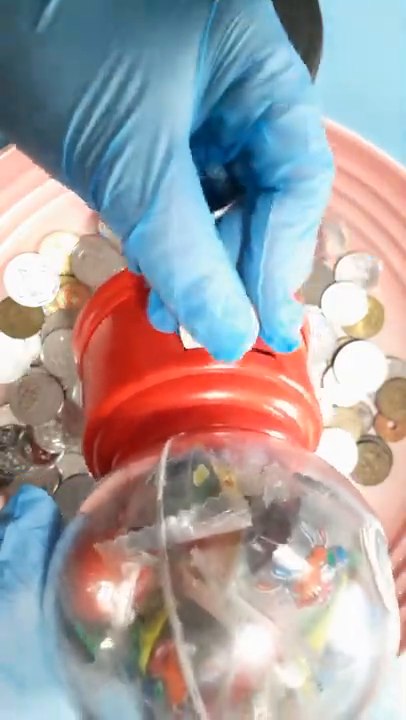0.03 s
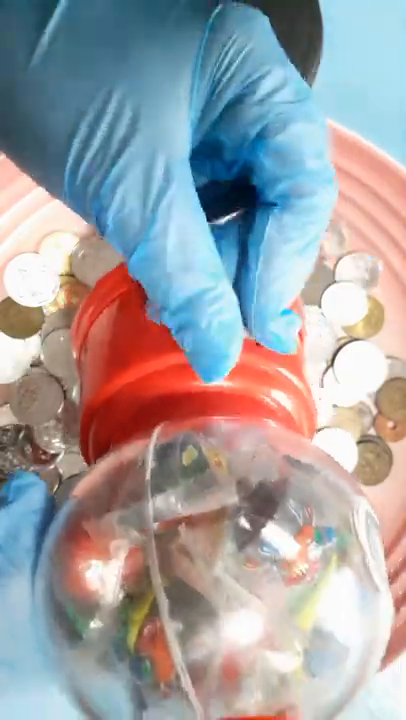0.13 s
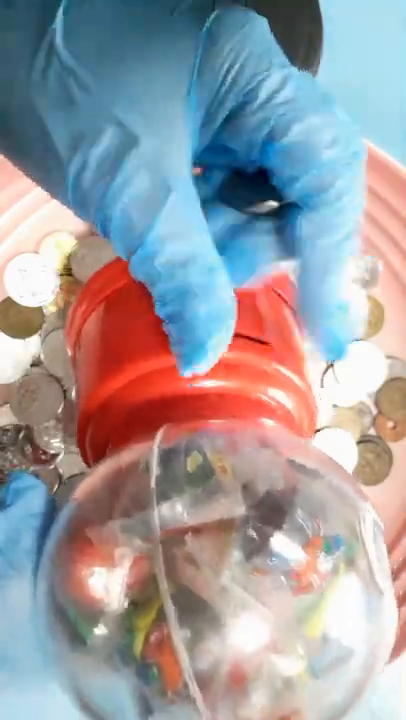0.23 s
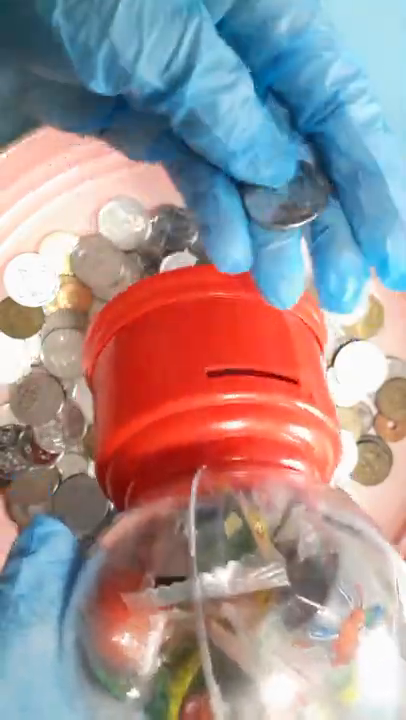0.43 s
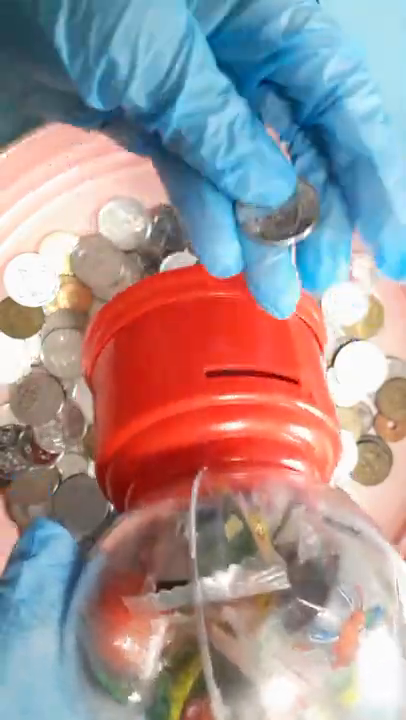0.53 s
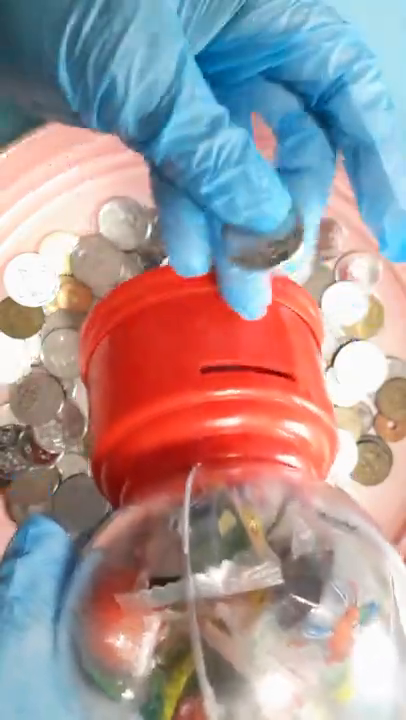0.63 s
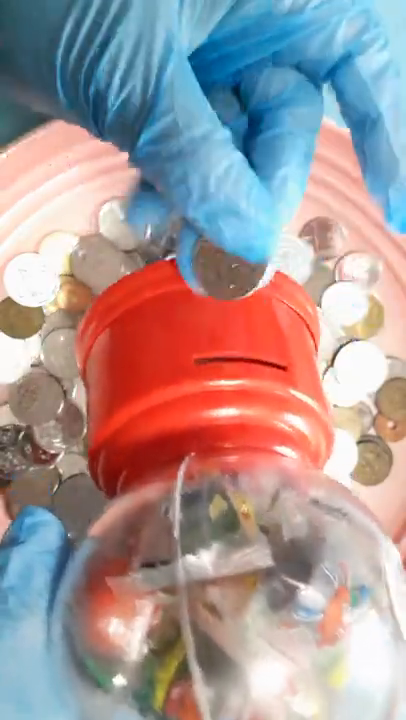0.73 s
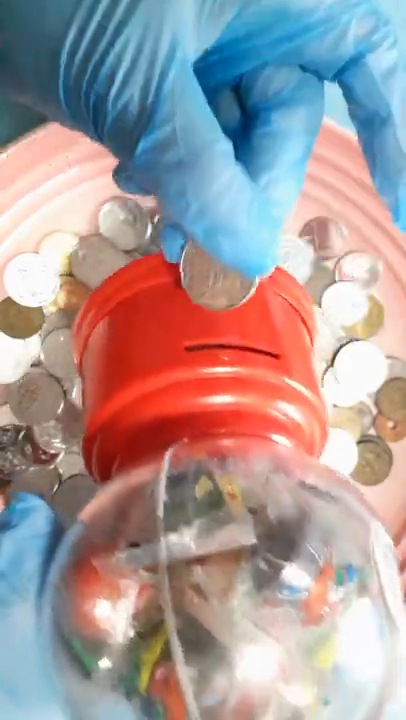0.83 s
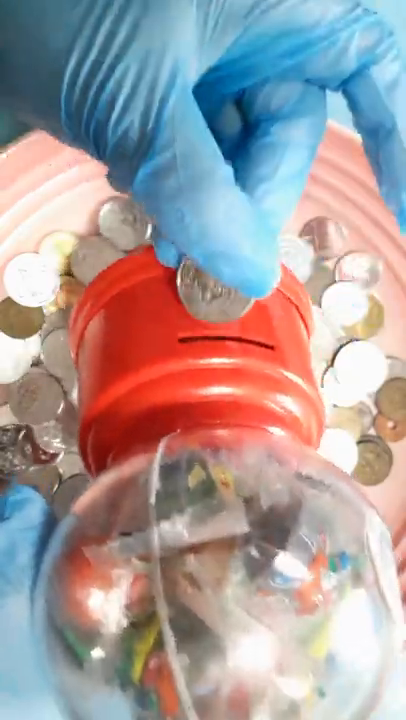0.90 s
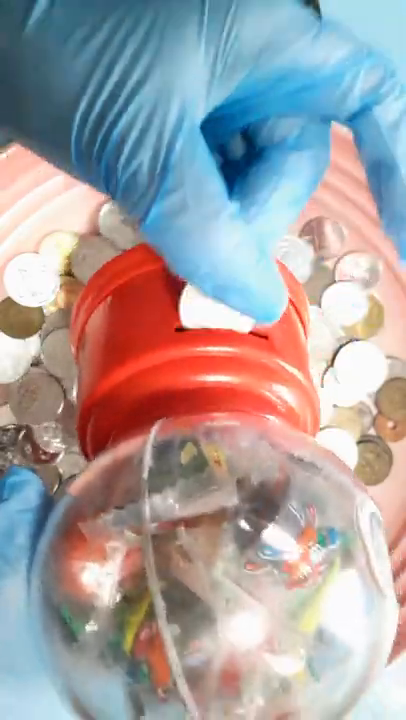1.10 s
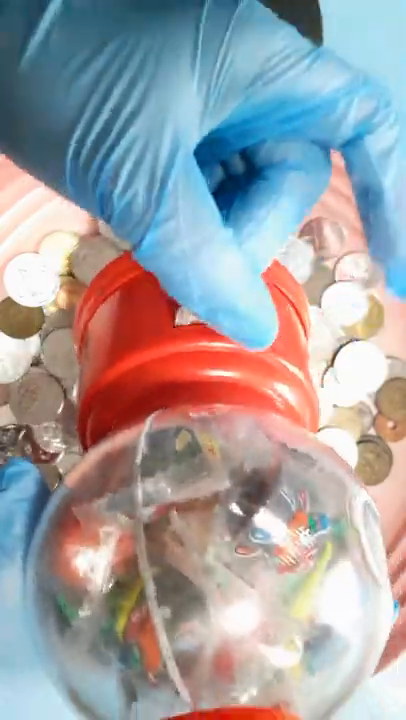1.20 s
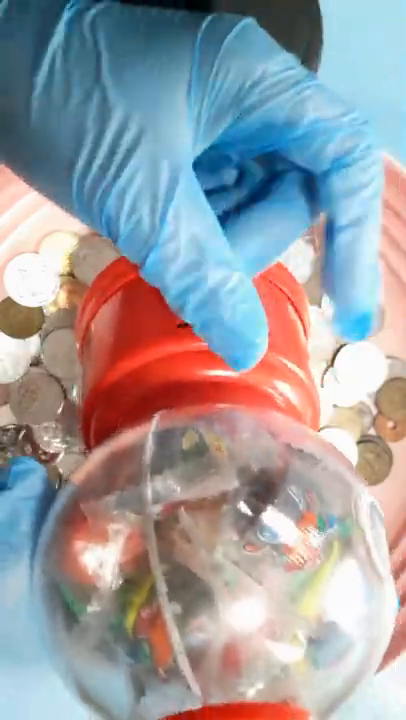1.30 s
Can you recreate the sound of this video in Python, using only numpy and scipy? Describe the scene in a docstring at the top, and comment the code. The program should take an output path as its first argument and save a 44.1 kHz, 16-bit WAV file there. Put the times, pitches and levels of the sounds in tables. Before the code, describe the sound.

Coin falling inside a thin plastic bank: brief sliding, a quick burst of bright knocks and clinks dying away, a quieter gap with faint rustling, then light taps and a short squeaky scrape. Close up indoors, faint fan air.

```python
"""A coin bounces down inside a small plastic gumball bank onto other coins, after a gloved hand pushes it in.
A second coin taps the lid, scrapes along it and catches in the slot; the glove rustles in between.
Contacts are shaped noise cracks with ringing modes, sliding is dense random slips, chatter is sparse clicks.
Close stereo microphone in a small room with a short diffuse tail; fan-like air noise and a low hum behind."""
import sys
import numpy as np
from scipy import signal
from scipy.fft import rfft, irfft, next_fast_len
from scipy.io import wavfile

SR = 44100
rng = np.random.default_rng(int(sys.argv[2]) if len(sys.argv) > 2 else 0)


def unload_audio(sound):
    """Save the sound as a 16-bit wav file, at the path given as the first command line argument."""
    columns = np.transpose(np.atleast_2d(sound))
    # keep every value between -1 and 1, then stretch to whole-number steps
    steps = np.round(np.clip(columns, -1, 1) * 32767)
    wavfile.write(sys.argv[1], SR, steps.astype(np.int16))


N = 59535
T = np.arange(N) / SR
SIZE = 2 * next_fast_len(N)  # padded transform length
FREQS = np.maximum(np.arange(SIZE // 2 + 1) * SR / SIZE, 1)

ATTACK_S = 0.00024  # rise time constant of every contact
RESONANCE_OCT, TREBLE_HZ = 0.2, 5460

# Colour of a coin sliding on plastic. Each row: frequency in Hz, relative noise density in dB per Hz.
SLIDE_COLOUR = [(100, -3), (500, -0.5), (1000, 1.5), (1900, 2.5), (3000, -3), (5000, -9.5), (8000, -7.5),
                (10000, -25.5), (16000, -18.5)]


def undb(db):
    """Decibels to an amplitude factor."""
    return 10 ** (np.asarray(db) / 20)


def unit(x):
    """Scale to rms 1."""
    return x / np.sqrt(np.mean(x ** 2))


def fade(t60):
    """Exponential decay that falls 60 dB in t60 seconds."""
    return np.exp(-np.log(1000) * T / max(t60, 1e-3))


def curve(points):
    """(Hz, dB) points joined on a log-frequency axis."""
    hz, db = np.array(points).T
    return np.interp(np.log(FREQS), np.log(hz), db)


def bump(hz, octaves):
    """Bell-shaped resonance of height 1."""
    return np.exp(-.5 * (np.log2(FREQS / hz) / octaves) ** 2)


def tint(x, db):
    """Causal (minimum-phase) filter with the given gain curve, by folding its cepstrum."""
    cepstrum = irfft(np.log(undb(db)))
    cepstrum[1:SIZE // 2] *= 2
    cepstrum[SIZE // 2 + 1:] = 0
    response = np.exp(rfft(cepstrum))
    return irfft(rfft(x, SIZE) * response)[..., :N]


def pan(db):
    """Left and right gains for a level difference; positive is louder on the left."""
    return undb(np.array([[1], [-1]]) * db / 2)


def place(x, at):
    """Delay a sound to its starting time."""
    start = int(np.clip(at * SR, 0, N - 1))
    return np.pad(x, ((0, 0), (start, 0)))[:, :N]


def spread(x, alike_hz, balance):
    """Two unrelated signals become left and right, alike in the bass, where the right arrives a little late."""
    lag_s = 0.00024  # full lag in the deep bass, shrinking as the sides grow unlike
    mid, side = rfft(x, SIZE)
    alike = 1 / (1 + (FREQS / alike_hz) ** 2)
    shared = mid * np.sqrt((1 + alike) / 2)
    opposed = np.array([[1], [-1]]) * side * np.sqrt((1 - alike) / 2)
    late = np.exp(-2j * np.pi * FREQS * alike * lag_s * np.array([[0], [1]]))
    return irfft((shared + opposed) * late * pan(curve(balance)))[:, :N]


def fan():
    """Steady air noise with a low resonance and thin noise-band whistles, plus a sine hum stronger on the right."""
    # Air noise. Each row: frequency in Hz, relative noise density in dB per Hz.
    air_colour = [(20, -37), (50, -34), (100, -14), (200, -12.5), (320, 4), (480, -18.5), (1000, -18.5),
                  (1900, -27), (3200, -31), (5000, -29.5), (8000, -34.5), (9800, -41.5), (15500, -38)]
    # Thin whistles. Each row: frequency in Hz, width in octaves, height in dB.
    whistles = [(2436, .06, 18.9), (4040, 0.056, 15.1), (5270, 0.083, 14)]
    # Lean of the air noise. Each row: frequency in Hz, left against right in dB.
    air_balance = [(100, -7.5), (300, -3.5), (1500, -12), (3000, -0.5), (8000, -10), (10500, 13),
                   (16000, 2.5)]
    air_db, alike_hz, hum_hz, hum_db = -56, 2490, 121.5, -71.5
    colour = curve(air_colour) + sum(db * bump(hz, width) for hz, width, db in whistles)
    noise = tint(rng.standard_normal((2, N)), colour)
    air = unit(spread(noise, alike_hz, air_balance))
    hum = pan(db=-9.0) * unit(np.sin(2 * np.pi * hum_hz * T))
    return undb(air_db) * air + undb(hum_db) * hum


def room(x):
    """A short diffuse tail from the walls: the close sound convolved with fading noise."""
    # Colour of the tail. Each row: frequency in Hz, gain in dB.
    wall_colour = [(100, 6.5), (400, 6), (1500, 3.5), (4000, 3), (8000, 0), (11000, -1), (16000, -1)]
    level_db, t60_s, build_s = -14, 0.23, 0.0049
    build = 1 - np.exp(-(T / build_s) ** 2)
    tail = rng.standard_normal((2, N)) * fade(t60_s) * build
    tail = tint(unit(tail) / np.sqrt(N), curve(wall_colour))
    return undb(level_db) * pan(db=-2.0) * signal.fftconvolve(x, tail, axes=1)[:, :N]


def friction(colour, at, rise, fall):
    """Dense tiny slips at random instants that swell and die away."""
    slips_per_s = 3500  # on average
    slips = (rng.random(N) < slips_per_s / SR) * rng.standard_normal((2, N))
    swell = np.exp(-.5 * ((T - at) / np.where(T < at, rise, fall)) ** 2)
    return unit(tint(slips, colour)) * swell


def rustles():
    """The glove rustles as the hand lets go: soft swells of friction."""
    # Each row: peak time in seconds, rise in seconds, fall in seconds, level in dB.
    moves = [(0.521, 0.091, 0.062, -68), (0.639, .03, 0.018, -65.5), (.75, 0.053, 0.052, -62.5)]
    # Colour of the glove. Each row: frequency in Hz, relative noise density in dB per Hz.
    glove_colour = [(200, -2), (1500, -3), (4000, -1), (8000, 0.5), (10500, -8), (14000, -3), (16000, -20)]
    return sum(undb(db) * friction(curve(glove_colour), at, rise, fall) for at, rise, fall, db in moves)


def scrapes():
    """The coin slides over the lid: friction with one resonance for each stroke."""
    # Each row: peak time in seconds, rise in seconds, fall in seconds, level in dB, resonance in Hz.
    strokes = [(0.028, 0.14, 0.036, -53, 1700), (0.144, 0.066, 0.074, -55, 966),
               (1.188, 0.068, 0.012, -53, 1660)]
    peak_db, width_oct = 4.5, 0.14
    sound = 0
    for at, rise, fall, db, hz in strokes:
        colour = curve(SLIDE_COLOUR) + peak_db * bump(hz, width_oct)
        sound = sound + undb(db) * friction(colour, at, rise, fall)
    return sound


def squeak():
    """The coin's edge sticks and slips on the lid: a brief rough note with its octave."""
    at_s, width_s, level_db = 1.192, .008, -45.5
    note_hz, note_oct, octave_db = 965, .08, -6
    gain = bump(note_hz, note_oct) + undb(octave_db) * bump(2 * note_hz, note_oct)
    colour = 20 * np.log10(gain + 0.0042)  # faint noise floor under the note
    return undb(level_db) * friction(colour, at_s, width_s, width_s)


def crack(t60):
    """The dense, quickly damped response of thin plastic, evened out in spectrum."""
    # Lean of a contact. Each row: frequency in Hz, left against right in dB.
    contact_balance = [(500, -5), (1200, 1), (2500, -0.5), (4500, 0), (6800, -6), (8300, -9), (10000, 9),
                       (12500, 8), (16000, -4.5)]
    snap_db, snap_t60_s, alike_hz = -6, 0.0074, 1884
    count = N // 16
    # the first instant of a contact is the hardest
    decay = fade(t60) + undb(snap_db) * fade(snap_t60_s)
    envelope = (decay * (1 - np.exp(-T / ATTACK_S)))[:count]
    burst = rng.standard_normal((2, count)) * envelope
    even = irfft(np.exp(1j * np.angle(rfft(burst))), count)  # flat spectrum, phases kept
    shaped = np.sign(even) * envelope
    return spread(np.pad(shaped, ((0, 0), (0, N - count))), alike_hz, contact_balance)


def scuffs():
    """The coin's rim skips against the slot: soft contacts that ring the lid's lowest resonance and its octave."""
    # Skips before the drop. Each row: start in seconds, relative level in dB.
    skips = [(0.104, -36), (0.1116, -39), (.128, -40.5), (0.1436, -38.5), (0.1528, -41)]
    lid_hz, width_oct, peak_db, t60_s = 910, 0.16, 9, 0.026
    resonances = bump(lid_hz, width_oct) + bump(2 * lid_hz, width_oct)
    colour = curve(SLIDE_COLOUR) + peak_db * resonances
    return sum(place(undb(db) * tint(crack(t60_s), colour), at) for at, db in skips)


def ring(modes):
    """Decaying modes, a little different in pitch and strength on each blow, that flutter as loose parts rattle."""
    rattle_per_s, rattle_depth = 110, .7
    pitch_scatter, scatter_db = .007, 1.5  # standard deviations: fraction of pitch, strength in dB
    count = N // 3
    time = T[:count]
    knots = np.arange(0, T[count] + 2 / rattle_per_s, 1 / rattle_per_s)
    steady = np.sqrt(1 - rattle_depth ** 2)
    out = np.zeros((2, count))
    for hz, db, t60 in modes:
        chance = rng.standard_normal((2, 2, len(knots))) * rattle_depth / np.sqrt(2)
        flutter = np.array([np.interp(time, knots, steady + a + 1j * b) for a, b in chance])
        detune, stronger = rng.standard_normal(2)
        pitch = hz * (1 + pitch_scatter * detune)
        tone = np.exp((2j * np.pi * pitch - np.log(1000) / t60) * time)
        phase = np.exp(2j * np.pi * rng.random((2, 1)))
        out += undb(db + scatter_db * stronger) * (flutter * tone * phase).imag
    return np.pad(out, ((0, 0), (0, N - count))) * (1 - np.exp(-T / ATTACK_S)) / 2


def contact(surface, at, db, t60, bass_db, treble_db, hz, peak_db, housing_db, pan_db, coin_db=None):
    """A crack on the plastic, coloured by where it lands; the housing rings, and a coin too if coin_db is given."""
    # Ringing of the plastic housing. Each row: frequency in Hz, relative level in dB, t60 in seconds.
    housing_modes = [(68, -26, .2), (302, -10.5, 0.13), (1074, -7, 0.059), (1487, -31, 0.039),
                     (1670, -14.5, 0.081), (1778, 6.5, 0.075), (2774, -13.5, 0.24), (3105, -15, 0.21),
                     (4330, -6.5, 0.053)]
    # Ringing of a loose coin. Each row: frequency in Hz, relative level in dB, t60 in seconds.
    coin_modes = [(3440, -10, 0.09), (4360, -16, 0.084), (6640, 3, 0.029), (7360, -7.5, 0.029),
                  (13400, 1, 0.03), (13600, 5.5, 0.03)]
    bass_hz = 720
    bass = 1 / (1 + (FREQS / bass_hz) ** 2)
    treble = 1 / (1 + (TREBLE_HZ / FREQS) ** 2)
    colour = surface + bass_db * bass + treble_db * treble + peak_db * bump(hz, RESONANCE_OCT)
    sound = tint(crack(t60), colour) + undb(housing_db) * ring(housing_modes)
    if coin_db is not None:
        sound = sound + undb(coin_db) * ring(coin_modes)
    return place(undb(db) * pan(pan_db) * sound, at)


def taps():
    """The coin touches the lid and the slot: dull cracks with some housing ring."""
    # Each row: start in seconds, relative level in dB, contact t60 in seconds, bass in dB, treble in dB,
    # resonance in Hz, its height in dB, housing ring in dB, left against right in dB.
    touches = [ (.001, -52.5, 0.049, 28, 9, 1840, 17, 1.5, 0),
               (0.9625, -35.5, 0.034, 11, 10.5, 1540, 8, -10, 0),
               (1.0787, -37.5, 0.025, 16.5, -1, 1380, 7.3, -43, 0),
               (1.2137, -47, 0.024, 11, 9, 4250, 10.5, -29, 4.5),
               (1.2875, -34, 0.023, -2.5, -16.5, 1820, 12.5, -12, 0),
               (1.3, -49, 0.025, 2, 2, 1690, 15, -16, 17),
               (1.3074, -30, 0.017, -22, -19, 3600, 3.5, -31, -4),
               (1.3227, -28, 0.019, -23, -6.5, 1730, 12.5, -0.5, 5.5),
               (1.3296, -35.5, 0.056, -6.5, -10, 1740, 14.7, -1.5, -1),
               (1.3343, -35.5, 0.032, 1, 5.5, 1780, 9.4, -15, 1),
               (1.348, -40.5, 0.026, 7, -14, 1200, 3.6, 3, -8)]
    # Colour of the lid. Each row: frequency in Hz, relative gain in dB.
    lid_colour = [(60, -29.5), (330, 1), (600, -7), (900, 7), (1250, 4), (1700, 9), (2150, 4.5), (3100, 1),
                  (4000, 5.5), (4700, 0), (6300, -3), (8000, 0.5), (10000, -17.5), (15500, -19.5)]
    return sum(contact(curve(lid_colour), *row) for row in touches)


def housing_surface():
    """Colour of a contact inside the housing, with its broad, quickly damped resonances."""
    # Each row: frequency in Hz, relative density in dB per Hz.
    knock_colour = [(40, -26.5), (200, -12), (380, -6.5), (1500, 4), (5000, 1), (8000, -1.5), (10500, -7.5)]
    # Each row: resonance in Hz, width in octaves, height in dB.
    body_resonances = [(450, 0.28, 14.5), (1064, 0.091, 8.5), (1420, 0.036, 4), (1763, 0.044, 7),
                       (2680, 0.03, 3.5), (3300, 0.13, 2), (4130, 0.21, 3), (5300, 0.061, 4.5),
                       (7470, 0.1, 4.5), (14040, 0.11, 8)]
    return curve(knock_colour) + sum(db * bump(hz, width) for hz, width, db in body_resonances)


def chatter(surface):
    """Between bounces the coin chatters along the wall in tiny uneven clicks that die away."""
    from_s, peak_s, to_s, first_share = .242, 0.25, 0.51, 0.65  # shares are squared below
    clicks_per_s, level_db, tilt_db = 900, -40, -1.5  # average rate; tilt per octave of treble
    strengths = rng.uniform(.3, 1, N) * rng.standard_normal((2, N))
    clicks = (rng.random(N) < clicks_per_s / SR) * strengths
    swell = np.interp(T, [from_s, peak_s, to_s], [first_share, 1, 0], left=0) ** 2
    colour = surface + tilt_db * np.log2(FREQS / TREBLE_HZ).clip(0)
    return undb(level_db) * unit(tint(clicks, colour)) * swell


def bounces(surface):
    """The coin strikes the housing and other coins as it falls; each blow adds a second resonance."""
    # Each row: start in seconds, relative level in dB, contact t60 in seconds, bass in dB, treble in dB,
    # resonance in Hz, its height in dB, housing ring in dB, left against right in dB, coin ring in dB,
    # second resonance in Hz, its height in dB.
    blows = [ (0.238, -20.5, 0.024, 0, 8.5, 1607, 11.5, -7, 2.5, -31, 2350, 2.5),
             (0.2639, -31.5, 0.026, -20, -8, 6560, 5, -36, 20, -20, 3730, 2),
             (0.2709, -14, 0.014, 6.5, 3.5, 3186, 12, -49, 6, -2, 4940, 5.5),
             (0.2842, -22.5, .04, -5, 3.5, 4370, 1.5, 1, -1.5, -12, 1400, -3),
             (0.2868, -29.5, 0.064, -5.5, 10.5, 2750, 9, -29, -1.5, -16, 4260, -4),
             (0.3124, -25.5, 0.014, -14.5, 4, 1360, 2.5, -22, 15, -28, 2400, 8),
             (0.3132, -20.5, 0.01, -11, -0.5, 6750, 13, -15, 3.5, 1, 1415, 15.5),
             (0.332, -28.5, 0.018, 2.5, 0.5, 3900, 11.5, -3, 1.5, -12, 1270, 2),
             (0.352, -38, 0.036, 7, -11, 3150, 5, -28, 3, -23, 5060, 12),
             (.3707, -26.5, 0.038, 0, 4, 1710, 6, -3, 0, -20, 2860, 4),
             (0.3893, -38, 0.019, 2.5, -4, 3000, 14.5, -7.5, 9.5, -6, 1100, -3),
             (0.4098, -38.5, 0.013, 2, -6, 3900, 12.5, -41, 4, -23, 1700, 0)]
    sound = 0
    for *row, hz, db in blows:
        sound = sound + contact(surface + db * bump(hz, RESONANCE_OCT), *row)
    return sound


def scene():
    """Bounces, taps and handling close by, their room tail, and the fan."""
    inside = housing_surface()
    fall = bounces(inside) + chatter(inside)
    near = fall + taps() + scuffs() + scrapes() + rustles() + squeak()
    return near + room(near) + fan()


def record(dry):
    """The loudest peaks are gently rounded, and the recorder cuts the top."""
    ceiling, top_hz = 1.25, 15900
    rounded = ceiling * np.tanh(dry / ceiling)
    low_pass = signal.ellip(10, .2, 80, top_hz, fs=SR, output="sos")
    return signal.sosfilt(low_pass, rounded)


dry = scene()
out = record(dry)
unload_audio(out)
```